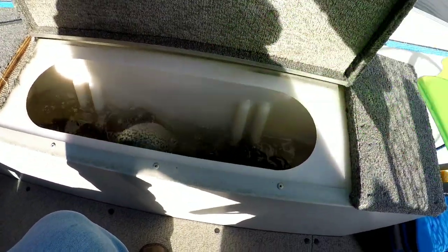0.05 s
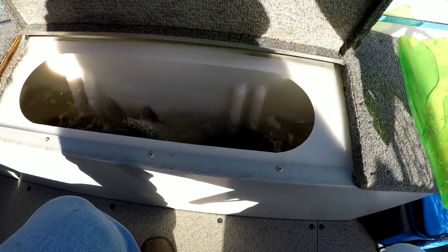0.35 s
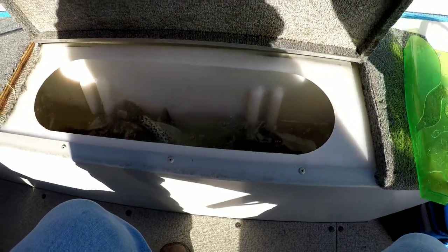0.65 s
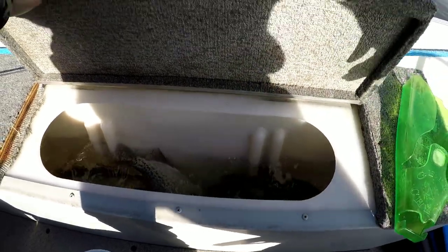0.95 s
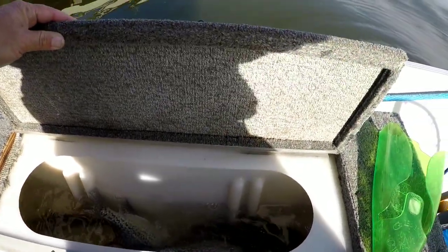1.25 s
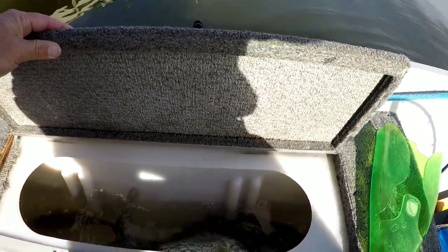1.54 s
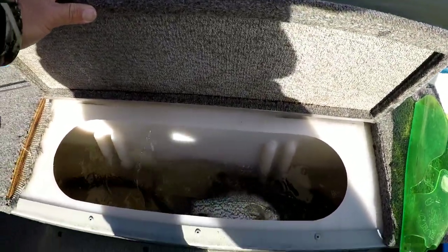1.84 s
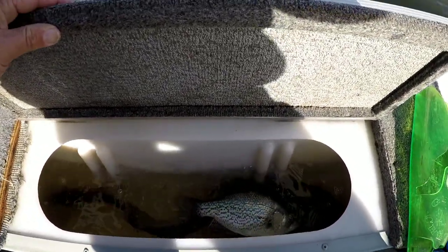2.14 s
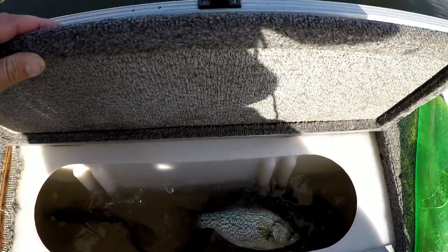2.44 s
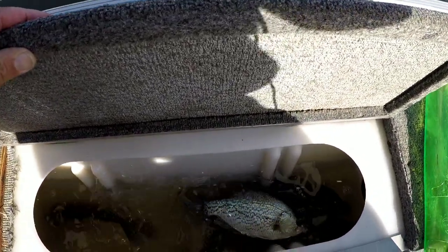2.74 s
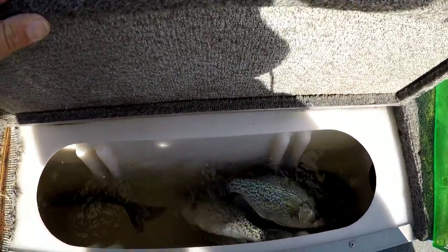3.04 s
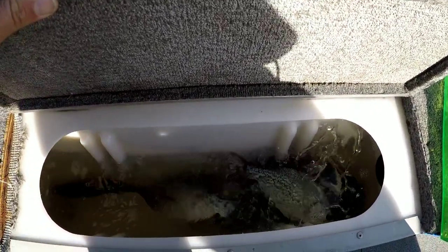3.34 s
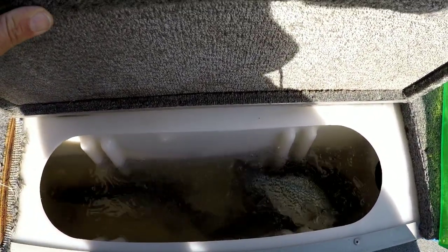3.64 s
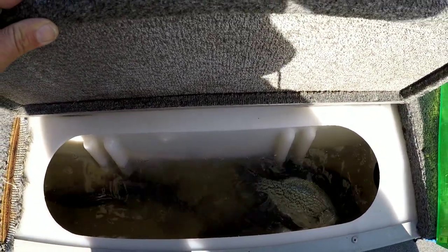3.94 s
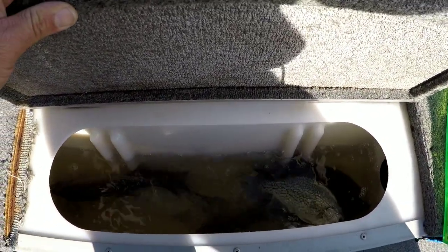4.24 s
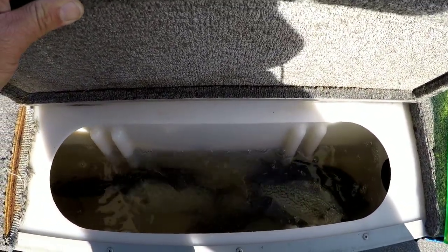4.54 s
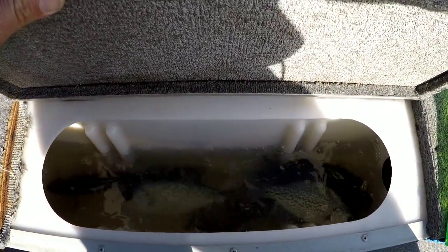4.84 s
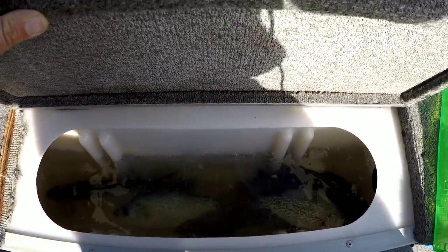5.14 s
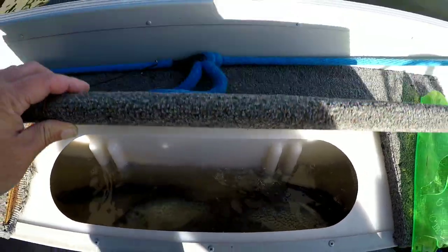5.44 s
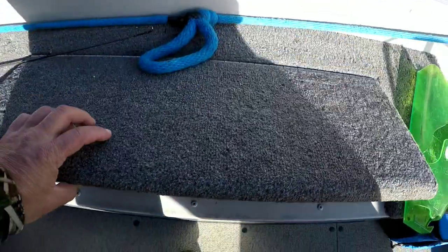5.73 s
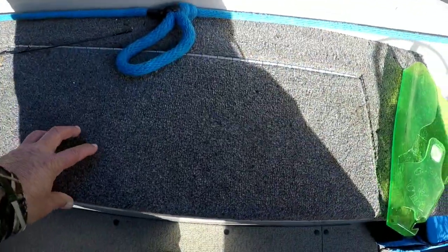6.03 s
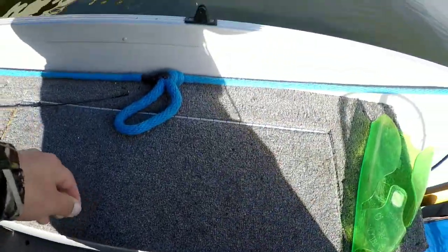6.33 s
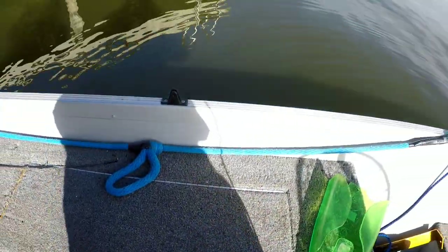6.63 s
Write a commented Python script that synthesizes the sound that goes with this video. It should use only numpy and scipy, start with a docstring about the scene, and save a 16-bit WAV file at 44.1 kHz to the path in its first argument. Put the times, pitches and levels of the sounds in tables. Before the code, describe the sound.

A hatch bumps open, fish thrash and gurgle in a tank of water, then the lid thuds shut over a light breeze.

```python
"""On a small boat on open water, fish stir and thrash in the live well, heard from close by.
Tails slap up spray, and air trapped by fins and drops rings as bubbles, the smaller the higher;
the resonances and echoes of the plastic tank colour it all. The carpeted hatch bumps open and
later drops shut, squeezing out the air beneath it. A sleeve rustles by friction, blows ring
the panels of the hull, and a breeze buffets the microphone."""
import sys
import numpy as np
from scipy import signal
from scipy.fft import rfft, irfft
from scipy.io import wavfile
from scipy.ndimage import uniform_filter1d

SR = 44100
rng = np.random.default_rng(int(sys.argv[2]) if len(sys.argv) > 2 else 0)


def unload_wav(signal):
    """Save mono or channel-first audio to the path in sys.argv[1] as 16-bit WAV at rate SR, clipped to [-1, 1]."""
    wavfile.write(
        sys.argv[1],
        SR,
        np.round(np.clip(np.atleast_2d(signal).T, -1, 1) * 32767).astype(np.int16),
    )


N = 298998
TIME = np.arange(N) / SR
TOP_HZ = 15300

# Spectra of open water, slow sway and rumble of air, rubbed cloth, churned bubbles, foam and
# tearing water. Each row: frequency in Hz, relative level in dB.
LAKE_SPECTRUM = [(260, -37.5), (450, -5.5), (1020, -16.5), (1240, -19), (2820, -24), (3670, -25),
                 (5220, -28), (12200, -32), (15000, -59)]
SWAY_SPECTRUM = [(4, 2), (8, 7.5), (14, -5), (22, -8)]
RUMBLE_SPECTRUM = [(18, -14.5), (30, 9.5), (50, -11), (90, -6.5), (130, -14), (200, -23.5), (400, -30),
                   (900, -69)]
CLOTH_SPECTRUM = [(240, -23), (400, -13), (458, -38), (723, -10.5), (949, -12.5), (1060, -13.5),
                  (2290, -13), (3050, -13.5), (8060, -22), (15000, -43)]
CHURN_SPECTRUM = [(240, -68), (400, -23), (465, 9), (576, -15), (1070, -4.5), (1370, -3), (1570, -5),
                  (2510, 7.5), (5860, -12), (6920, -14), (15000, -18)]
FOAM_SPECTRUM = [(3500, -12), (5200, -4), (8500, 1), (15000, -16)]
SLOSH_SPECTRUM = [(700, -25), (1150, -10), (1900, 8), (2600, -2.5), (3600, 9.5), (4600, -24), (5700, 3),
                  (6800, -11), (11000, -11.5), (15000, -19)]
# The breeze: a deep rumble and a flutter above it. Each row: time in seconds, deep rumble in dB, flutter in dB.
RUMBLE_LEVELS = [(0.14, -44, -55.5), (1.0, -38, -47.5), (1.31, -39, -54), (1.36, -28, -54),
                 (1.58, -28, -45), (2.6, -26.5, -46), (2.84, -36.5, -45.5), (2.95, -32.5, -57.5),
                 (3.64, -35.5, -48.5), (3.75, -41, -60), (4.46, -36.5, -52), (4.48, -35.5, -57.5),
                 (5.1, -36, -56.5), (5.16, -31.5, -58), (5.39, -30, -49.5), (6.25, -39, -46.5),
                 (6.49, -41, -47), (6.6, -27, -48.5)]
# A faint hiss at the start, fading away; the later rows are sleeve rustle.
# Each row: start in seconds, level in dB, build-up and T60 in seconds.
RUSTLE_SWELLS = [(0, -60.5, 0.00087, 1.5), (.478, -64.5, 0.002, 5.5), (1.42, -63, 0.16, 6.9),
                 (5.27, -64, 0.18, 6.1), (6.3, -63.5, 0.23, 4.1)]
# Resonances excited by rubbing. Each row: centre in Hz, width in Hz, level in dB.
RUB_MODES = [(416, 15, 3.5), (627, 31, 3), (1088, 46, 0), (1490, 72, -10), (2027, 43, -5), (2440, 35, -15)]
# Hand, sleeve and shoe on carpet.
# Each row: start in seconds, level in dB, centre in Hz, width in octaves, length in seconds.
CARPET_SCUFFS = [(.478, -54, 2500, 1.0, 0.007), (0.48, -60, 3200, 0.7, 0.14), (0.49, -57, 3350, 0.6, 0.015),
                 (.49, -63.5, 7140, 0.56, 0.052), (0.577, -52, 3600, 1.6, 0.01),
                 (0.62, -62, 5800, .7, .011), (0.788, -53.5, 2170, 1.7, 0.01),
                 (0.893, -58, 3150, 1.6, 0.018), (1.463, -56, 520, 0.61, 0.028),
                 (1.494, -50.5, 2000, 0.71, 0.018), (1.498, -54, 573, 1.6, 0.085),
                 (1.704, -50.5, 545, 1.1, 0.0084), (5.432, -67.5, 2760, 1.6, 0.1),
                 (6.047, -70, 2520, 0.58, 0.53), (6.072, -67.5, 2300, 0.31, 0.026),
                 (6.119, -62.5, 1620, 0.76, 0.026), (6.16, -59, 816, 1.0, 0.023),
                 (6.354, -54, 1550, 1.45, 0.037), (6.493, -59, 1360, 0.91, 0.045),
                 (6.543, -61.5, 1720, 1.6, 0.036), (6.575, -60.5, 1090, 0.6, 0.048),
                 (6.582, -65, 3240, .4, .03)]
# Fine spatter landing. Each row: start in seconds, level in dB, centre in Hz, length in seconds.
SPATTER_PUFFS = [(1.897, -59.5, 8400, 0.038), (1.953, -63, 7100, 0.074), (2.072, -50.5, 8000, 0.0085),
                 (2.098, -58.5, 8550, 0.023), (2.409, -67, 8740, 0.015), (2.511, -62, 9800, .008),
                 (2.706, -46.5, 8000, 0.025), (2.757, -61, 8200, 0.029), (2.897, -62, 9500, 0.011),
                 (3.21, -54, 7350, 0.01), (3.27, -49.5, 8740, .018), (3.315, -55, 8240, 0.02),
                 (3.375, -51, 8100, 0.019), (3.475, -45, 8000, .022), (3.5, -54, 7800, 0.016)]
# Fins, tails and heavy drops striking the water.
# Each row: start in seconds, level in dB, trim of the body in dB, trim of the fizz in dB.
WATER_SLAPS = [(0.084, -38, 10.5, 0), (0.1468, -44, 6, -6.5), (0.2078, -35.5, -3, -13),
               (0.244, -46, -7, -29), (0.4257, -46.5, -22, -3.5), (1.266, -60, -11, -8),
               (1.8103, -53.5, -20, 14.5), (1.8859, -31.5, -18, -8), (1.916, -53, -13, -4),
               (2.002, -47, -24, 4), (2.0287, -42, -25, 0), (2.0895, -40.5, 4, -5), (2.148, -47, 1, -5),
               (2.3436, -46.5, -18, -3), (2.397, -35, -25, -10), (2.4239, -35, -25, -9),
               (2.5642, -47.5, 12, -12), (2.6236, -47, -20.5, -1), (2.676, -30, 7.5, -16),
               (2.6879, -29.5, 2.5, -4.5), (2.719, -47, -29, -6), (2.7416, -35, -3, -1.5),
               (2.7581, -40, -9, -5), (2.798, -45, -28, -3), (2.8107, -35, -24, -20),
               (2.8525, -39, -8.5, -6.5), (2.8794, -48, -25, -11), (2.945, -46, -9, -4),
               (3.0059, -44, -2, -15), (3.214, -48.5, -23.5, -5), (3.2418, -40.5, -2, -5),
               (3.272, -30, -32, -7), (3.288, -25, 8, -22), (3.3022, -22, -22, -7.5),
               (3.349, -32.5, -17, -14), (3.375, -33, -18, -3), (3.4335, -31, -9.5, -12),
               (3.478, -28.5, -19, -25), (3.505, -42, -25, -8), (3.549, -45, -3, -35),
               (3.6063, -48, 10.5, -19), (3.991, -57, -24, -5.5), (4.128, -51.5, -3, -11),
               (4.404, -55.5, 3, -18)]
# Churning after a slap: a louder and a fainter layer fading together.
# Each row: level in dB relative to the slap, build-up and T60 in seconds.
STIR_LAYERS = [(-17.5, 0.026, 0.33), (-37.5, .03, 0.37)]
# Single bubbles. Each row: start in seconds, pitch in Hz, level in dB, glide in starting
# pitches per second.
SINGLE_BUBBLES = [(.085, 3780, -29, 14), (.15, 1237, -32.5, 1), (0.209, 1476, -28, 0),
                  (0.377, 1090, -51, 1.5), (0.402, 1335, -48, 5.5), (0.403, 2640, -45, 8),
                  (.86, 4500, -46, -16), (.989, 1300, -53, 2.5), (1.659, 3140, -46.5, 8),
                  (1.829, 4150, -46.5, -3), (1.912, 588, -47.5, -1), (1.915, 5760, -37, -4),
                  (1.962, 3970, -42, 13), (1.977, 5140, -41, 24), (1.986, 5000, -40, 4.5),
                  (2.004, 3340, -38, 67), (2.032, 1630, -40, 7), (2.032, 5220, -35, 7),
                  (2.148, 1224, -46.5, -1), (2.338, 2330, -39, 0), (2.375, 1582, -31.5, -0.5),
                  (2.091, 7540, -40, 8), (2.809, 4340, -36, 7), (3.273, 2940, -34, 67),
                  (2.412, 1274, -39.5, 3), (2.568, 2730, -36, 5.5), (2.678, 3370, -31, 8),
                  (2.694, 633, -36.5, 8), (2.728, 1003, -33.5, 7.5), (2.737, 3630, -34, 14),
                  (2.764, 1175, -37.5, 4), (2.785, 1276, -38, -6), (2.804, 4280, -36, 30),
                  (2.882, 2760, -41, 5), (2.886, 1285, -48, -1), (3.098, 1220, -46.5, 5),
                  (2.424, 5200, -38, 4), (2.676, 4300, -42, 27), (2.765, 4280, -30.5, 18),
                  (3.241, 4480, -38, 21), (3.381, 5600, -36, 19), (3.408, 2790, -31, 19.5),
                  (3.479, 3760, -27, 12.5), (3.481, 5570, -28, 26), (3.254, 1230, -45, 6.5),
                  (3.302, 1785, -20.5, 25), (3.324, 1043, -31, 5.5), (3.466, 1070, -29.5, 5.5),
                  (3.477, 3150, -27.5, 49), (3.658, 1260, -50, 14)]
# Air pockets collapsing behind a fin. Each row: start in seconds, pitch in Hz, level in dB.
AIR_POCKETS = [(1.873, 840, -31.5), (2.578, 1020, -32), (2.718, 1700, -18), (3.287, 1450, -23),
               (3.292, 994, -13), (3.482, 1060, -28)]
# Bubbles that ring all the way up. Each row: start in seconds, pitch in Hz, level in dB, ascent
# in seconds, top pitch before sag in Hz, time constant of the climb in seconds, held share in dB.
RISING_BUBBLES = [(0.085, 646, -21, .222, 2217, 0.043, -24.5), (2.082, 1115, -35, 0.025, 2320, 0.024, 3.5),
                  (2.716, 1366, -35, 0.015, 2140, 0.0088, -13), (3.371, 802, -45, 0.075, 1010, 0.016, 0),
                  (3.392, 1736, -38.5, .021, 3580, 0.0105, 0), (3.432, 1483, -30, 0.013, 2070, 0.013, -15),
                  (3.507, 988, -36, 0.057, 1530, 0.017, -9.5)]
# Air resonances of the tank. Each row: frequency in Hz, T60 in seconds, level in dB.
TANK_MODES = [(590, 0.3, -22), (1015, 0.29, -11.5), (1227, 0.088, 1), (1990, 0.055, 5), (2630, .09, -6.5),
              (3273, 0.07, 10), (3850, 0.063, -7), (5820, 0.031, 6.5)]
# Blows on hatch, tank wall and hull.
# Each row: start in seconds, main pitch in Hz, level in dB, T60 of the longest mode in seconds.
PANEL_BLOWS = [(0.795, 205, -18, 0.2), (.894, 313.6, -41, 0.23), (.908, 188.6, -22, 0.11),
               (0.953, 182, -29, 0.11), (1.358, 88.5, -19.5, 0.16), (1.51, 61.4, -9.5, 0.048),
               (1.626, 85, -25, 0.28), (1.768, 99.6, -33, 0.15), (1.701, 288, -44, 0.042),
               (1.88, 220, -23, 0.029), (1.998, 106.6, -23, 0.14), (2.456, 111.6, -25, 0.15),
               (2.55, 108, -19, 0.021), (2.666, 195.5, -34, 0.25), (2.695, 460, -27, 0.035),
               (2.918, 112, -25, 0.14), (3.225, 380, -39.5, 0.15), (3.306, 210, -27.5, 0.057),
               (4.128, 114.6, -31.5, 0.177), (4.345, 380.5, -42, 0.16), (5.19, 592, -60, 0.047),
               (5.468, 381.4, -47, 0.2), (5.982, 304, -28.5, 0.049), (5.993, 83, -14.5, 0.12),
               (6.007, 157, -22.5, 0.11), (6.069, 900, -51, 0.041), (6.445, 282, -41.5, 0.034),
               (6.646, 332, -49.5, 0.36), (6.651, 104.5, -14, 0.097)]
# Modes of a panel. Each row: multiple of the main pitch, level in dB, share of the blow's T60.
PANEL_MODES = [(.74, -2, 0.84), (1, 6.5, 0.8), (1.26, -14.5, 1), (1.94, -15.5, 0.61), (2.898, -41, 0.27)]
# Sheets of water swept aside by a fish.
# Each row: start in seconds, level in dB, length in seconds, tilt towards the treble in dB.
WATER_SHEETS = [(1.875, -45, .03, -4), (2.33, -52, 0.1, 0.5), (2.409, -46.5, 0.074, 1),
                (2.553, -44, 0.032, 1), (2.653, -42, .02, 1.5), (2.675, -35.5, 0.037, -3.5),
                (2.717, -37, 0.015, 1), (2.728, -48, .035, -3), (2.757, -45.5, .02, 8),
                (2.793, -46.5, 0.032, 5.5), (2.869, -50, 0.054, 0.5), (3.267, -37, .03, -3.5),
                (3.297, -38, 0.026, -2), (3.361, -46, 0.086, 2), (3.439, -42, .022, 1.5),
                (3.459, -38.5, 0.034, 3.5), (3.477, -30.5, 0.013, 4), (3.499, -40.5, 0.026, 7)]
# Resonances of the gap under the hatch. Each row: centre in Hz, width in Hz, level in dB.
GAP_MODES = [(753, 180, 3.5), (1210, 550, -0.5), (1970, 520, -0.5), (2660, 590, 2.5), (3460, 510, 2.5),
             (5400, 1200, -6.5), (8550, 3400, -12)]


def undb(db):
    """Amplitude grows tenfold with every 20 dB."""
    return 10 ** (np.asarray(db) / 20)


def unit(x):
    """Normalisation to an rms of 1."""
    return x / np.sqrt(np.mean(x ** 2) + 1e-20)


def add(out, s, x):
    """Superposition: x joins out from s seconds on."""
    i = max(int(s * SR), 0)
    out[i:i + len(x)] += x[:max(len(out) - i, 0)]


def band(x, lo_hz, hi_hz, order=2):
    """Causal band-pass filtering."""
    sos = signal.butter(order, [lo_hz, min(hi_hz, .45 * SR)], "band", fs=SR, output="sos")
    return signal.sosfilt(sos, x)


def colour(x, spectrum):
    """Spectral shaping that falls away past both ends of the spectrum; rms 1."""
    hz, db = np.transpose(spectrum)
    f = np.maximum(np.arange(N // 2 + 1) * SR / N, 1)
    skirts = np.minimum(f / hz[0], 1) ** 2 * np.minimum(hz[-1] / f, 1) ** 4
    gain = undb(np.interp(np.log(f), np.log(hz), db))
    return unit(irfft(rfft(x) * gain * skirts, N))


def walk(per_s):
    """Random fluctuation made of smoothed steps; rms 1."""
    k = int(SR / per_s)
    steps = np.repeat(rng.standard_normal(N // k + 1), k)
    return unit(uniform_filter1d(uniform_filter1d(steps, k), k)[:N])


def ring(t60, rise_s):
    """Time axis and envelope of a build-up with exponential decay, 60 dB in t60 seconds."""
    t = np.arange(int((t60 + 2 * rise_s) * SR) + 2) / SR
    return t, np.exp(-np.log(1000) * t / t60) * (1 - np.exp(-t / rise_s))


def crackle(per_s, spread_db):
    """Shot noise: independent clicks of uneven size; rms 1."""
    clicks = (rng.random(N) < per_s / SR) * rng.choice([-1, 1], N)
    return unit(clicks * undb(spread_db * np.minimum(rng.exponential(size=N), 3)))


def puff(x, s, hz, octaves, length_s):
    """Windowing: one band of x, taken from s seconds on, swells and fades."""
    n = int(length_s * SR)
    half = 2 ** (abs(octaves) / 2)
    stretch = band(x[int(s * SR):][:n], hz / half, hz * half, order=3)
    return np.sqrt(np.abs(np.hanning(n))) * unit(stretch)


def lake(level_db=-68.5):
    """Open water gives a faint broadband noise of nearly steady level."""
    return colour(rng.standard_normal(N), LAKE_SPECTRUM) * undb(level_db + 0.49 * walk(7.1))


def breeze(split_hz=58):
    """Pressure fluctuations on the microphone: infrasonic sway, deep rumble and flutter above it."""
    times, *levels = np.transpose(RUMBLE_LEVELS)
    deep_db, flutter_db = (np.interp(TIME, times, db) for db in levels)
    sway = unit(np.tanh(.5 * colour(rng.standard_normal(N), SWAY_SPECTRUM)))
    sway = unit(band(sway, 2, 14, order=3)) * undb(-18.5 + 0.32 * (deep_db - deep_db.mean()))
    rumble = colour(rng.standard_normal(N), RUMBLE_SPECTRUM) * undb(2.4 * walk(22))
    deep = unit(band(rumble, 12.8, split_hz, order=3)) * undb(deep_db)
    flutter = unit(band(rumble, split_hz, 2900, order=3)) * undb(flutter_db + 2)
    return signal.windows.tukey(N, .02) * (sway + deep + flutter)


def rustle(cloth_db=2, modes_db=-8, slide_at_s=0.53, slide_length_s=0.32):
    """Stick-slip friction: fibres catch, let go and excite resonances; hand and shoe scuff carpet."""
    swells, slide = np.zeros((2, N))
    for s, db, rise_s, t60 in RUSTLE_SWELLS:
        add(swells, s, undb(db) * ring(t60, rise_s)[1])
    # The hand slides along the hollow hatch before it swings back.
    add(slide, slide_at_s, undb(-63.5) * signal.windows.tukey(int(slide_length_s * SR), .2))
    fibres = crackle(7000, spread_db=3)
    modes = unit(sum(undb(db + 2 * walk(20)) * band(fibres, hz - width / 2, hz + width / 2, order=1)
                     for hz, width, db in RUB_MODES))
    cloth = undb(cloth_db) * colour(fibres, CLOTH_SPECTRUM) * swells
    out = (cloth + modes * (undb(modes_db) * swells + slide)) * undb(1.2 * walk(45))
    grit = crackle(3000, spread_db=2.9)
    for s, db, hz, octaves, length_s in CARPET_SCUFFS:
        add(out, s, undb(db) * puff(grit, s, hz, octaves, length_s))
    return out


def stirring(idle_db=-88, lead_s=0.0068):
    """Incoherent sources add in power: each slap raises the surface's agitation, which then decays."""
    power = np.full(N, undb(idle_db) ** 2)
    for stir_db, rise_s, t60 in STIR_LAYERS:
        env = ring(t60, rise_s)[1]
        for s, db, *_ in WATER_SLAPS:
            # A fin moves the water before it breaks the surface.
            add(power, s - lead_s, (undb(db + stir_db) * env) ** 2)
    return np.sqrt(power)


def bubble(hz, t60, glide):
    """Trapped air is a damped oscillator whose pitch climbs as it nears the surface."""
    t, env = ring(t60, 0.0005)
    return env * np.sin(2 * np.pi * hz * (t + glide * t * t / 2))


def churn(count=3200, level_db=-5):
    """Many small bubble resonances merge into a noise that follows the stirring."""
    out = np.zeros(N)
    for when, size, life, loud, climb in rng.random((count, 5)):
        hz = 750 * 9 ** size
        t60 = (7 + 22 * life) / hz
        add(out, when * N / SR, undb(8 * loud) * bubble(hz, t60, 0.084 * climb / t60) * np.sqrt(hz))
    return colour(out, CHURN_SPECTRUM) * stirring() * undb(level_db)


def foam(count=6000, spread_db=16, cycles=22):
    """Tiny bubbles resonate high and briefly, and sum to a steady fizz; rms 1."""
    out = np.zeros(N)
    for when, size, loud in rng.random((count, 3)):
        hz = 3800 * 4 ** size
        add(out, when * N / SR, undb(spread_db * loud) * hz * bubble(hz, cycles / hz, glide=40))
    return colour(out, FOAM_SPECTRUM)


def wash(surge_db=-10, foam_db=-10, patchy_db=4):
    """Modulated noise: stirred water surges against the walls, foam fizzes, spatter lands in puffs."""
    surge = unit(band(rng.standard_normal(N), 230, 520)) * undb(surge_db + patchy_db * walk(40))
    fizz = foam()
    out = (surge + fizz * undb(foam_db + patchy_db * walk(83))) * stirring()
    for s, db, hz, length_s in SPATTER_PUFFS:
        add(out, s, undb(db) * puff(fizz, s, hz, 0.72, length_s))
    return out


def bubble_burst(t60, lo_hz, hi_hz, cycles, count):
    """Tiny resonators thin out, with the total energy of a noise that decays from rms 1 over t60."""
    out = np.zeros(int((t60 + .04) * SR))
    for when, size, life, loud, climb in rng.random((count, 5)):
        hz = lo_hz * (hi_hz / lo_hz) ** size
        ring_s = cycles * (0.24 + life) / hz
        delay = when ** 2  # densest in the first instant
        gain = undb(4.7 * loud - 69 * delay) * np.sqrt(hz)
        add(out, 0.38 * t60 * delay, gain * bubble(hz, ring_s, 0.19 * climb / ring_s))
    return out * np.sqrt(t60 * SR / (2 * np.log(1000)) / np.sum(out ** 2))


def slaps(t60=0.08, tear_s=0.0011, patchy_db=3):
    """An impact snaps, displaces water (body), tears it (spray, fizz) and entrains bubbles."""
    body = unit(band(rng.standard_normal(N), 520, 1250, order=3))
    spray = unit(band(crackle(5000, spread_db=4.5), 1400, 5800, order=3))
    fizz = unit(band(crackle(5000, spread_db=6), 6500, 14000))
    spray, fizz = (unit(x * undb(patchy_db * walk(230))) for x in (spray, fizz))
    body_env, spray_env, fizz_env, bubbles = np.zeros((4, N))
    for s, db, body_db, fizz_db in WATER_SLAPS:
        add(body_env, s, undb(db + body_db - 7) * ring(0.65 * t60, tear_s)[1])
        add(spray_env, s, undb(db - 13) * ring(t60, tear_s)[1])
        add(fizz_env, s, undb(db + fizz_db - 11) * ring(0.59 * t60, 0.0018)[1])
        add(fizz_env, s, undb(db + fizz_db - 8) * ring(0.0029, .0001)[1])  # snap of contact
        add(bubbles, s, undb(db - 11) * bubble_burst(t60, 1500, 6120, cycles=14, count=28))
        mist = bubble_burst(0.52 * t60, 7840, 10740, cycles=32, count=10)
        add(bubbles, s, undb(db + fizz_db - 11) * mist)
    return body_env * body + spray_env * spray + fizz_env * fizz + bubbles


def plops(t60_at_1khz=0.057, pocket_cycles=22, pocket_glide=4.9, linger_db=-14, wobble=0.042):
    """Bubble resonance: smaller ones die sooner, and a wobbling shape modulates pitch and level."""
    out = np.zeros(N)
    warp_s = np.cumsum(wobble * walk(600)) / SR
    rings = [(s, hz, db, pocket_cycles / hz, pocket_glide) for s, hz, db in AIR_POCKETS]
    for s, hz, db, glide in SINGLE_BUBBLES:
        t60 = t60_at_1khz * (1000 / hz) ** 0.77
        depth = 1 / (1 + abs(glide) / 3.2)  # a bubble that stays deep glides little and lingers
        rings += [(s, hz, db, t60, glide), (s, hz, db + linger_db, t60 * 2.9 * depth, glide)]
    for s, hz, db, t60, glide in rings:
        t, env = ring(t60, 0.0003)
        t = t + np.interp(s + t, TIME, warp_s) - np.interp(s, TIME, warp_s)
        add(out, s, undb(db) * env * np.sin(2 * np.pi * hz * (t + glide * t * t / 2)))
    return out * undb(3.5 * walk(700))


def bloops(wobble=0.1, full_sag=0.15, sag_s=0.0356, deep_ascent_s=0.22, first_t60=0.085, held_t60=1):
    """A bubble's pitch follows its depth: it sags when pushed down and sweeps up near the surface."""
    out = np.zeros(N)
    unsteady = wobble * walk(500)
    for s, hz, db, ascent_s, top_hz, climb_s, held_db in RISING_BUBBLES:
        t = np.arange(int(ascent_s * SR)) / SR
        climb = np.expm1(t / climb_s) / np.expm1(ascent_s / climb_s)
        sag = full_sag * (1 - np.exp(-t / sag_s)) * min(ascent_s / deep_ascent_s, 1) ** 2
        pitch = hz * (1 - sag) + (top_hz - hz) * climb
        pitch *= 1 + np.sqrt(climb) * np.interp(s + t, TIME, unsteady)
        held = min(undb(held_db), 1)
        env = (1 - held) * undb(-60 * t / first_t60) + held * undb(-60 * t / held_t60)
        env *= (1 - np.exp(-t / 0.000077)) * (1 - climb ** 2)  # sharp onset, silent at the surface
        add(out, s, undb(db) * env * np.sin(2 * np.pi * np.cumsum(pitch) / SR))
    return out


def falling_drops(count=3, flight_s=0.061, spread_db=10, lo_hz=2200, hi_hz=8500, cycles=24):
    """Impact and entrainment: each drop thrown up by a slap ticks as it lands and traps a bubble."""
    pings, ticks = np.zeros((2, N))
    for (s, slap_db, *_), thrown in zip(WATER_SLAPS, rng.random((len(WATER_SLAPS), count, 4))):
        drop_db = -48 + 0.58 * (slap_db + 34)  # harder slaps throw louder drops
        for height, size, loud, climb in thrown:
            hz = lo_hz * (hi_hz / lo_hz) ** size
            gain = undb(drop_db + spread_db * (loud - height))
            lands_s = s + flight_s * height
            add(pings, lands_s, gain * bubble(hz, cycles / hz, 25 * climb))
            add(ticks, lands_s, gain * np.ones(1))
    return pings + undb(-4) * band(ticks, 2500, 11500)


def tank(direct, modes_db=-13, echo_t60=0.07):
    """Cavity resonance and quick wall reflections follow the direct sound in the open tank."""
    t, env = ring(echo_t60, 0.00057)
    echoes = band(rng.standard_normal(len(t)), 470, 8100, order=1) * env
    response = np.zeros(SR // 3)
    add(response, .0015, undb(-2) * echoes / np.sqrt(np.sum(echoes ** 2)) / 2)
    for hz, t60, db in TANK_MODES:
        t, env = ring(t60, 0.00028)
        add(response, 0, undb(modes_db + db) * 300 / SR * env * np.cos(2 * np.pi * hz * t))
    return direct + signal.fftconvolve(direct, response)[:N]


def knocks(build_cycles=0.71, thud_db=-20):
    """Padded blows excite panel modes, the deeper blows building more slowly; carpet adds a thud."""
    modes, contact = np.zeros((2, N))
    for s, hz, db, t60 in PANEL_BLOWS:
        rise_s = build_cycles / hz
        for multiple, mode_db, share in PANEL_MODES:
            t, env = ring(t60 * share, rise_s)
            add(modes, s, undb(db + mode_db) * env * np.sin(2 * np.pi * hz * multiple * t))
        add(contact, s, undb(db) * hz / 200 * ring(0.058, rise_s)[1])
    return modes + undb(thud_db) * contact * unit(band(rng.standard_normal(N), 140, 650))


def sloshes(hiss_db=-6, patchy_db=7, lo_hz=900, hi_hz=6500, pivot_hz=2600, count=34, cycles=14):
    """Sheet break-up: swept water swells and tears into patchy hiss and short, rising bubble tones."""
    low_env, high_env, bubbles = np.zeros((3, N))
    swarms = rng.random((len(WATER_SHEETS), count, 5))
    for (s, db, length_s, tilt_db), swarm in zip(WATER_SHEETS, swarms):
        swell = np.sin(np.pi * np.linspace(0, 1, int(length_s * SR)) ** 0.63) ** 2
        add(low_env, s, undb(db - tilt_db) * swell)
        add(high_env, s, undb(db + tilt_db) * swell)
        plips = np.zeros(len(swell) + SR // 20)
        for when, size, life, loud, climb in swarm:
            hz = lo_hz * (hi_hz / lo_hz) ** size
            t60 = cycles * (.5 + life) / hz
            plip_db = 13 * loud + tilt_db * np.log2(hz / pivot_hz)
            gain = swell[int(when * len(swell))] * undb(plip_db) * np.sqrt(hz)
            add(plips, when * length_s, gain * bubble(hz, t60, 0.4 * climb / t60))
        add(bubbles, s, undb(db - 3) * plips * np.sqrt(np.sum(swell ** 2) / np.sum(plips ** 2)))
    tearing = colour(crackle(9000, spread_db=3.5), SLOSH_SPECTRUM)
    low = low_env * band(tearing, 400, pivot_hz)
    high = high_env * band(tearing, pivot_hz, TOP_HZ)
    hiss = sum(x * unit(undb(patchy_db * walk(220))) for x in (low, high))
    return bubbles + undb(hiss_db) * hiss


def hatch_air(falls_s=5.4, shuts_s=6.003, fastest_s=0.023, seal_s=0.021, level_db=-43):
    """Squeeze flow: air escapes through the carpet faster as the gap narrows, until the hatch seals."""
    noise = crackle(9000, spread_db=3.2)
    hiss = sum(undb(db) * band(noise, hz - width / 2, hz + width / 2) for hz, width, db in GAP_MODES)
    speed = (fastest_s / np.maximum(shuts_s - TIME, fastest_s)) ** 1.09
    falling = np.clip((TIME - falls_s) / 0.05, 0, 1)
    unsealed = np.clip((shuts_s - TIME) / seal_s + .5, 0, 1)
    return unit(hiss) * undb(level_db + 2 * walk(70)) * speed * falling * unsealed


def scene():
    """All sources superpose in one channel; only the water in the well excites the tank."""
    water = plops() * undb(-0.5) + bloops() + slaps() + sloshes() + falling_drops() + churn() + wash()
    return (tank(water) + knocks() + rustle() + hatch_air() + breeze() + lake())[None]


def record(dry):
    """Band limiting: a steep low-pass removes the highest treble."""
    return signal.sosfilt(signal.ellip(8, .2, 70, TOP_HZ, fs=SR, output="sos"), dry)


dry = scene()
out = record(dry)
unload_wav(out)
```